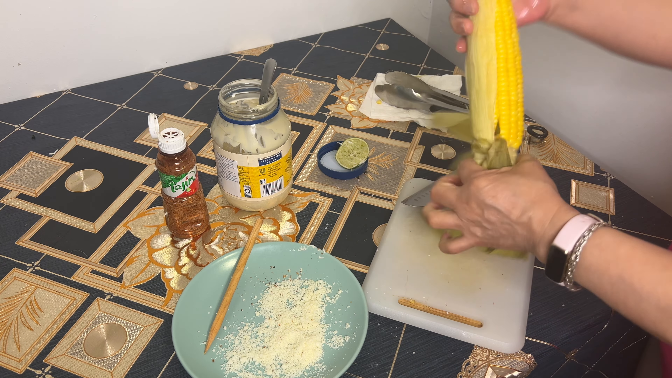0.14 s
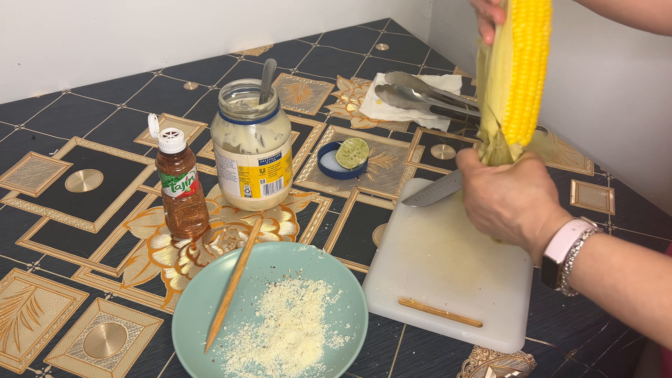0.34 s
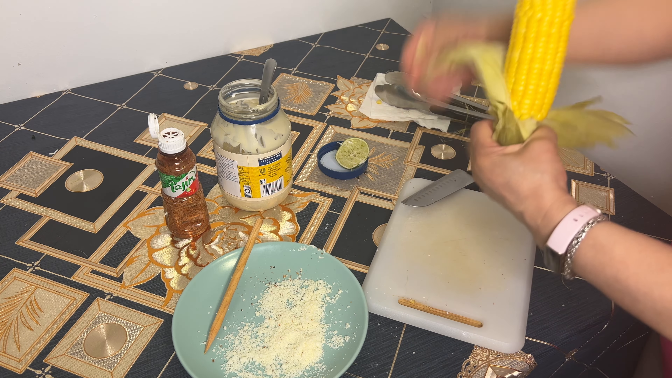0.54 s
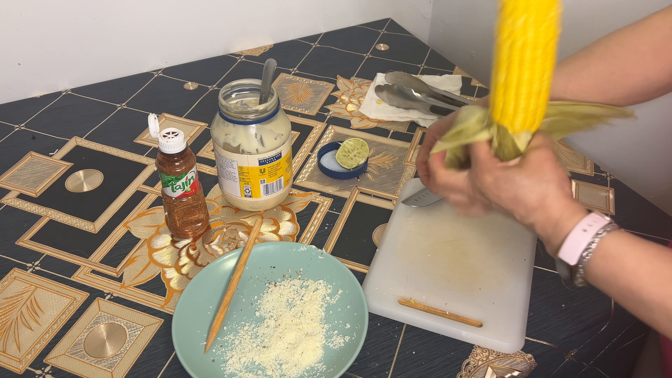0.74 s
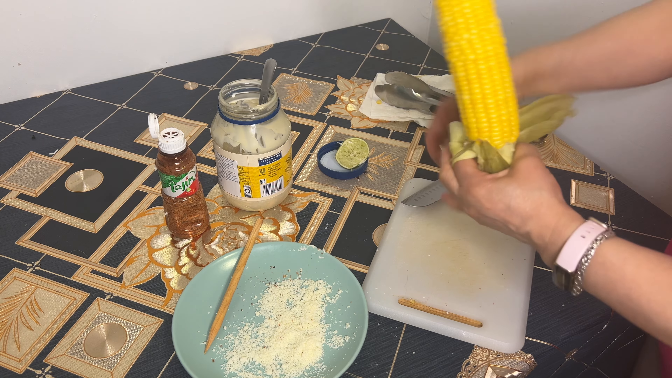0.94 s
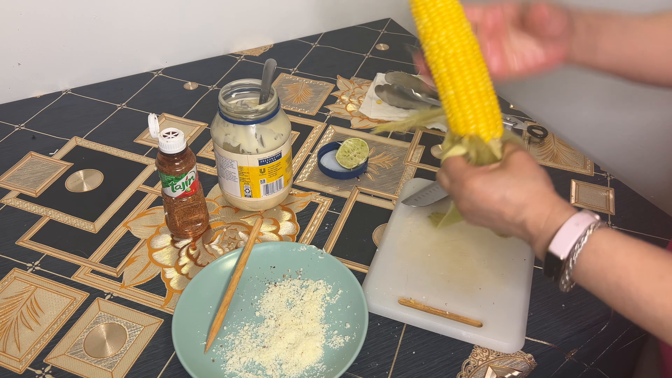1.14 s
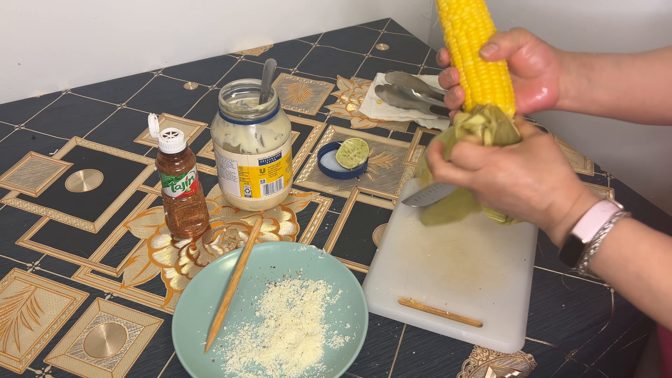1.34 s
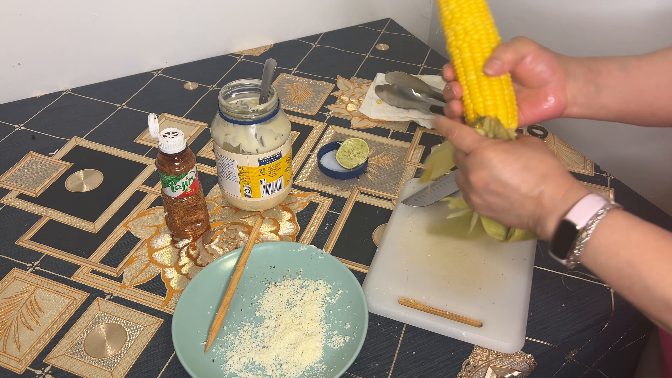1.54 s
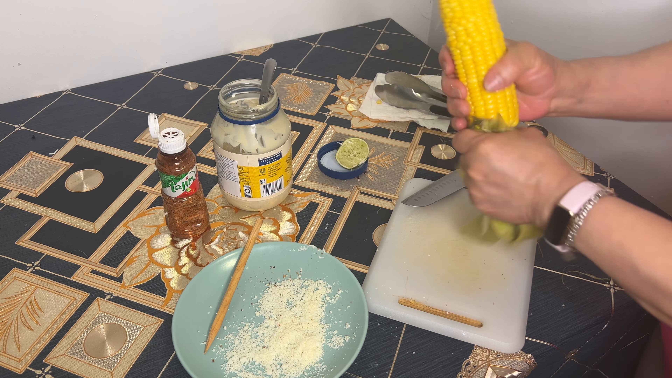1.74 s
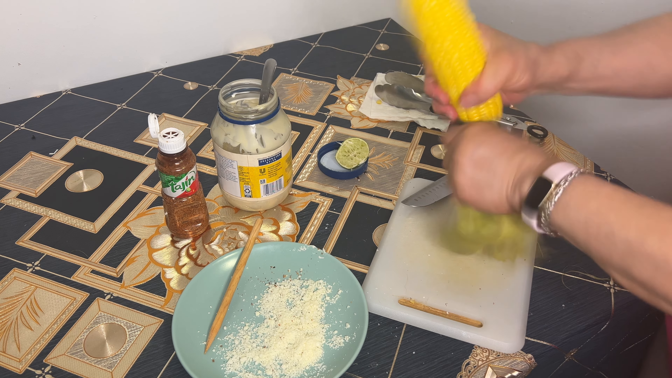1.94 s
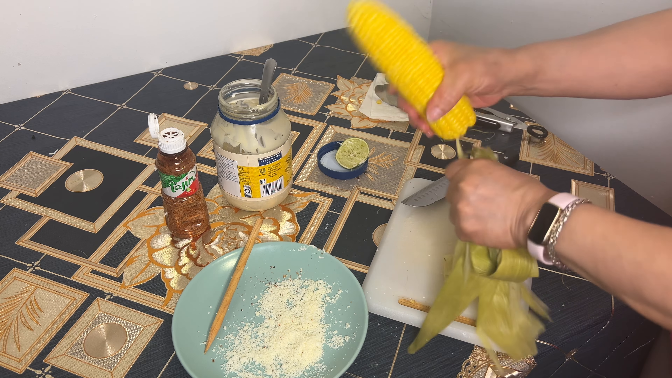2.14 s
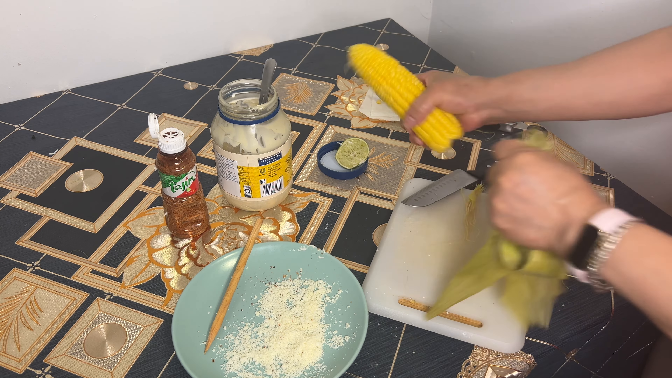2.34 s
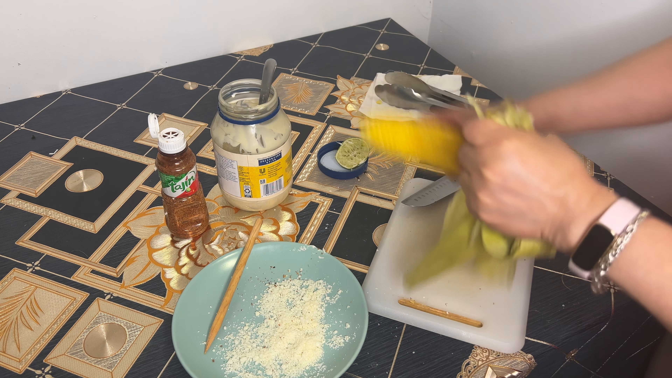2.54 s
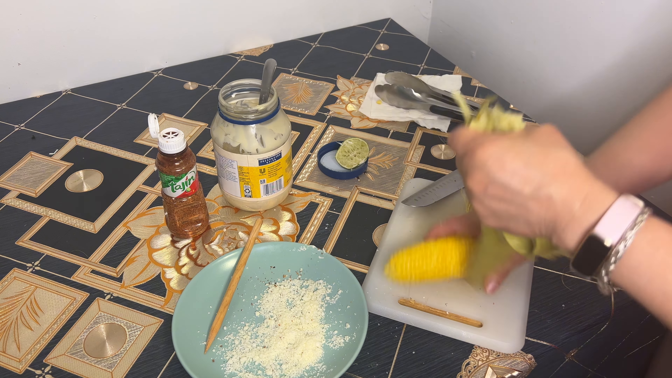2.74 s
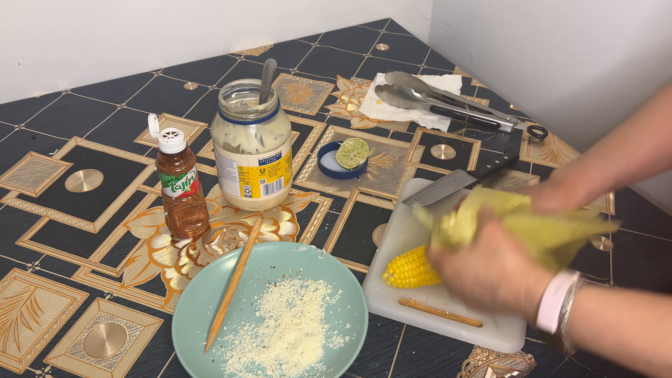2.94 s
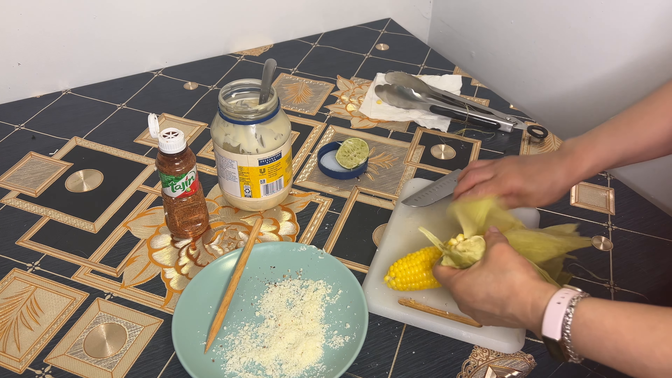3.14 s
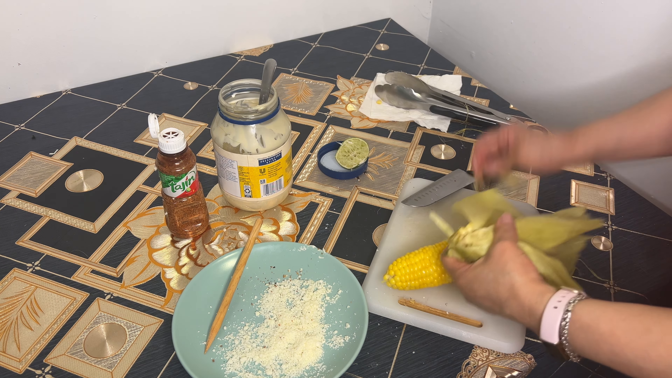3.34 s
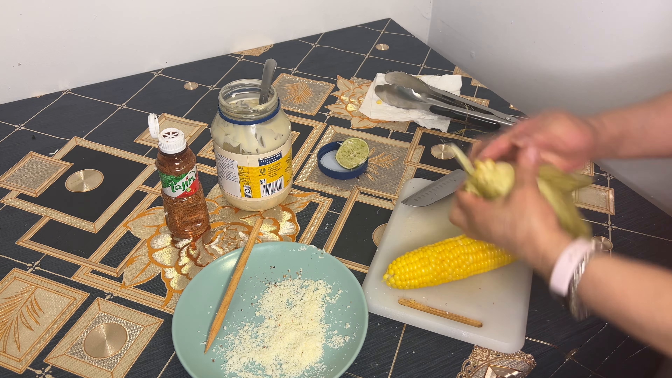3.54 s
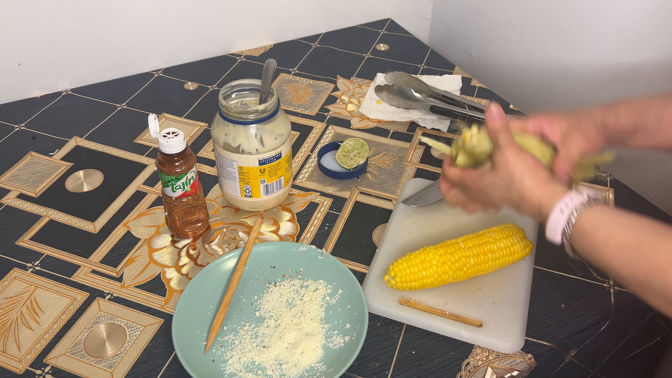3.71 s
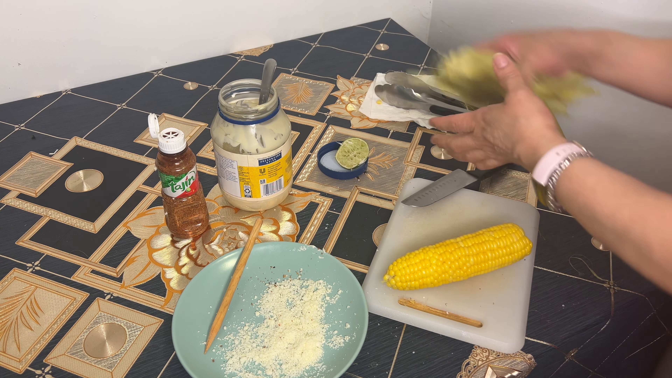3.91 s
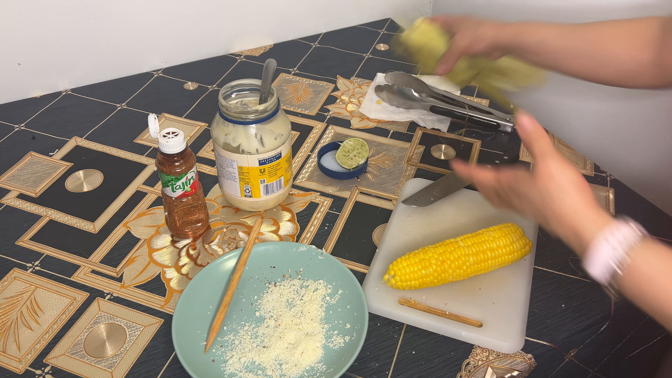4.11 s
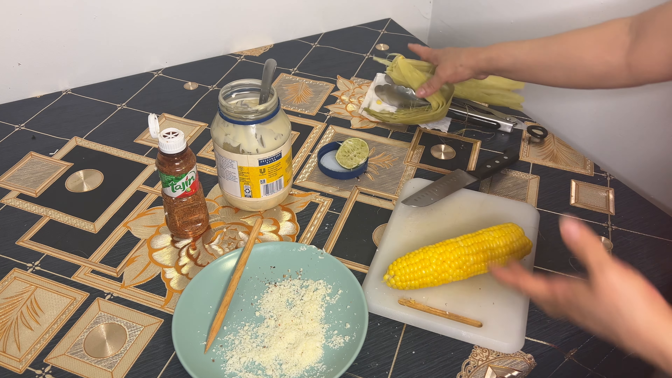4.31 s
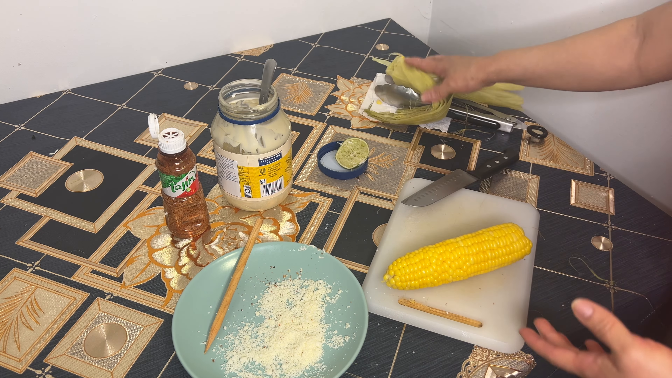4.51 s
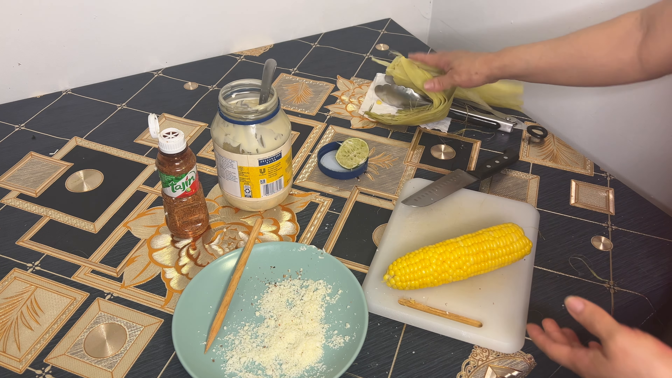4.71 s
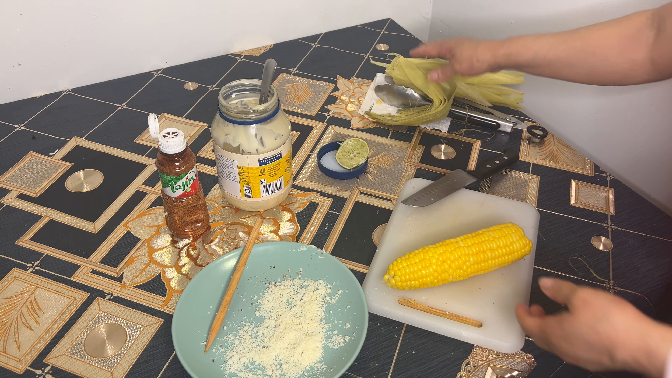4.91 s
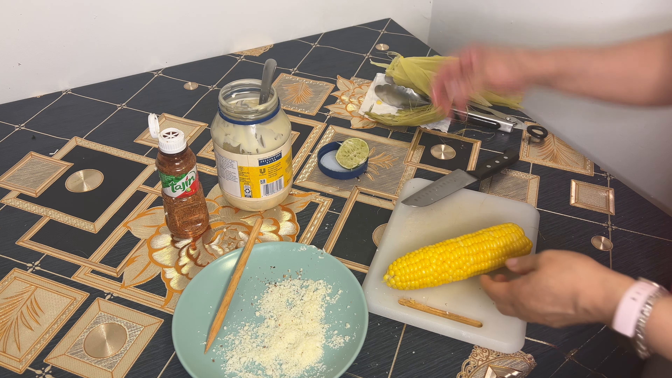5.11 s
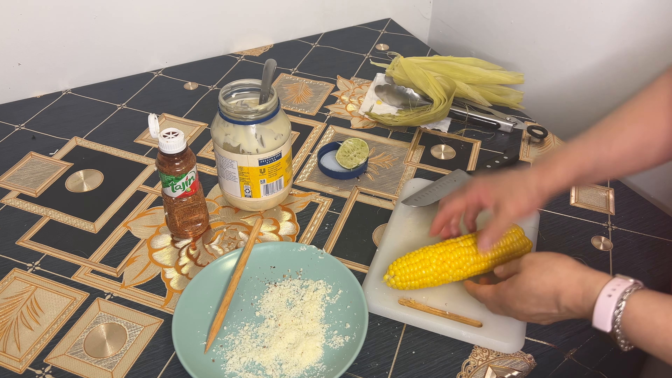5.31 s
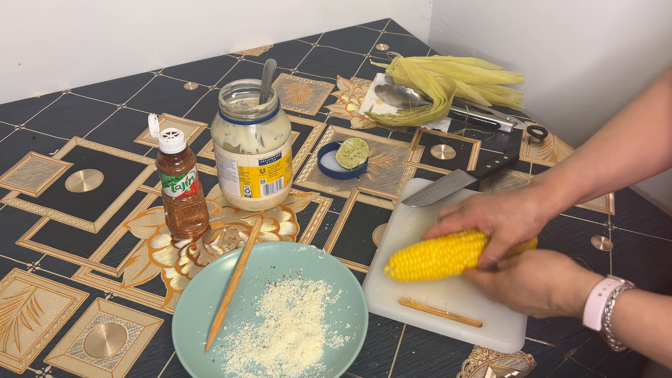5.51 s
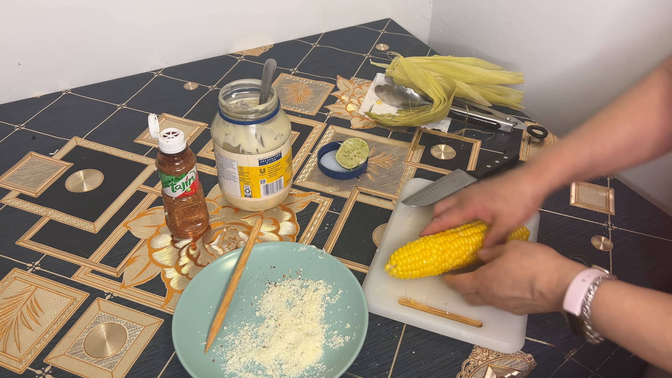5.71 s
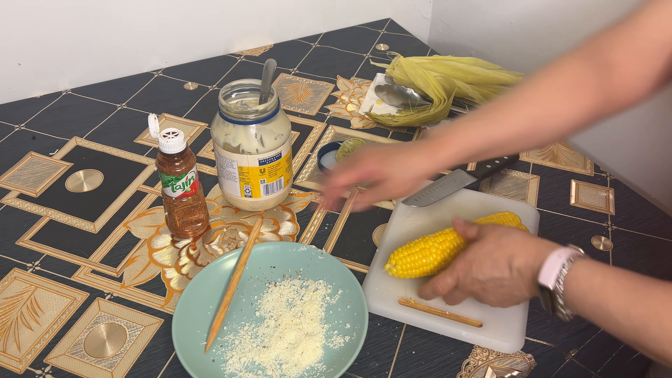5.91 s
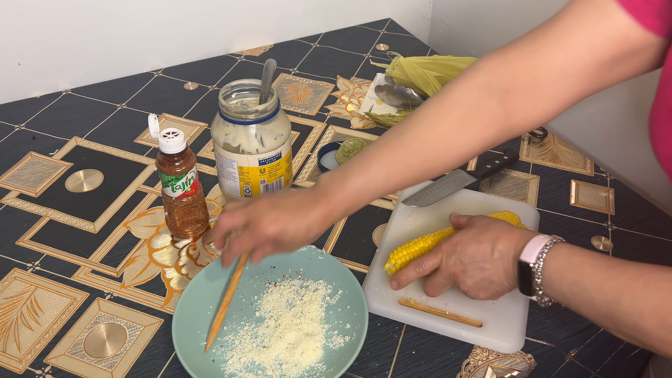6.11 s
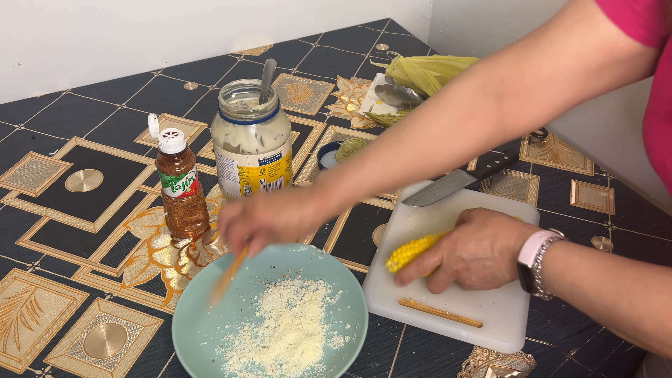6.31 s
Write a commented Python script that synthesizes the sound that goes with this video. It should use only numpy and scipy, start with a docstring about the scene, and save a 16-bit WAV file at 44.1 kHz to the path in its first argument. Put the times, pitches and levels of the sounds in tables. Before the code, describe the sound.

Dry corn husks rustle and snap as they are torn off an ear, then the cob thuds on a plastic cutting board in a quiet kitchen.

```python
"""Dry leaves rustle and crackle first: hands peel the husks off an ear of corn over a kitchen table.
Fibres snap as noise bursts, the stem rings as it breaks, and the cob knocks a plastic board and the table,
whose modes ring. Near the end a wooden stick clinks on a bowl. Soft low thumps and a puff of air on the
microphone are a few low cycles each, and filtered noise makes the rumble, hum and air stream of an
appliance behind a small room."""
import sys
import numpy as np
from scipy import signal
from scipy.fft import rfft, irfft, next_fast_len
from scipy.io import wavfile
from scipy.ndimage import uniform_filter1d, map_coordinates

SR = 44100
rng = np.random.default_rng(int(sys.argv[2]) if len(sys.argv) > 2 else 0)


def inscribe(sig):
    """Save sig as 16-bit PCM at rate SR to the path in sys.argv[1].

    A 1-D sig is mono; a 2-D sig holds one channel per row.
    Samples are clipped to [-1, 1] before scaling.
    """
    pcm = np.round(np.clip(np.atleast_2d(sig).T, -1, 1) * 32767)
    wavfile.write(sys.argv[1], SR, pcm.astype(np.int16))


N = 284606

# colour of the rustle as heard, for both hiss and creases: pitch_hz, relative gain_db
RUSTLE_COLOUR = [(150, -19), (400, -1), (900, -8.5), (2000, -3.5), (3000, -4), (4200, -6), (5200, -4),
                 (7000, -10.5), (8600, 1), (10200, -14.5), (11500, -2.5), (12800, -14), (14000, -13),
                 (16000, -8.5)]


def rustle():
    """Leaves slide over each other: a patchy hiss with creases crackling on it; strokes swell, sag and let go."""
    # strokes of the hands: peak_s, level_db, swell_s, length_s, sag_db_per_s,
    # top_db (top octave), body_db (stiff leaf bases), both relative to the stroke
    strokes = [(0.0, -62, .01, 0.067, 141, -4, 1.5), (0.091, -60.5, 0.037, 0.024, 20, -8.5, 4),
               (0.143, -65.5, 0.032, .12, 97, -12, -1), (0.309, -65.5, 0.067, 0.11, 103, -13, 2),
               (0.413, -67.5, .015, 0.12, 20, -8, -1), (0.625, -59, 0.11, 0.1, 194, -7.5, 1.5),
               (0.729, -62.5, 0.008, 0.13, 54, -0.5, 5), (0.993, -67, 0.31, 0.11, 64, -15, -1),
               (1.209, -65.5, 0.0086, 0.17, 54, -15, 1.5), (1.409, -72.5, .015, .3, -14.5, -11, 7),
               (1.787, -60.5, 0.077, 0.15, 92, -10.5, 2.5), (1.935, -43, 0.0056, 0.036, 250.5, 7.5, 1.5),
               (1.961, -50.5, .02, 0.13, 46, -0.5, 2), (2.143, -64, 0.033, 0.085, 30, -6, -3.5),
               (2.258, -67.5, .01, 0.023, 5, -1.5, 6), (2.27, -61, .02, 0.57, 65, -6, 5),
               (2.609, -58, 0.0062, .12, 141, -5, -4), (2.755, -67.5, 0.063, 0.08, -1, -10.5, 10.5),
               (2.845, -55, 0.012, .03, 200, -6.5, 0.5), (2.896, -64.5, 0.035, 0.21, 2, -13, 1),
               (3.181, -52.5, .005, 0.25, 142, -17, 9), (3.502, -59.5, .004, 0.078, 115, -10, 4.5),
               (3.626, -69, 0.058, .2, 5, -16, 4.5), (4.142, -62, .01, 0.036, 5, -4, 6),
               (4.185, -56, 0.074, 0.23, 174, -10.5, 0.5), (4.51, -75.5, 0.071, .05, 94, -14, 7),
               (4.653, -64.5, 0.032, 0.092, 130, -12, 6.5), (4.86, -73, 0.037, .02, 303, -7.5, 11),
               (5.01, -85, 0.085, 1.3, 0.5, -12, 7.5), (5.595, -79.5, .04, .03, 202, -24, -4),
               (6.19, -72.5, 0.24, 0.16, 41, -17.5, 5)]
    swell_depth_db, release_db_per_s = 19.5, 297
    dulling = 0.44  # extra fall of the top octave, as a share of the stroke's fall in dB
    t = np.arange(0, N / SR + 1, 1 / 1000)
    power = np.zeros((3, len(t)))  # middle, top, body
    for s, level_db, swell_s, length_s, sag_db_per_s, top_db, body_db in strokes:
        sag_db = sag_db_per_s * np.clip(t - s, 0, length_s)
        release_db = release_db_per_s * np.clip(t - s - length_s, 0, None)
        fall_db = sag_db + release_db
        stroke_db = level_db - swell_depth_db * np.clip(s - t, 0, None) / swell_s - fall_db
        band_db = [stroke_db, stroke_db + top_db - dulling * fall_db, stroke_db + body_db]
        power += amp(band_db) ** 2
    hiss = noise(RUSTLE_COLOUR, patchy_db=2) * amp(1.6 * wobble(40))
    leaf = hiss + amp(-6.5) * crackle(1500, cycles=2.1, spread_db=2.0)
    top = filtered(leaf, lambda hz: above(hz, 5700))
    body = filtered(leaf, lambda hz: 1 - above(hz, 1900))
    middle = leaf - top - body
    gains = np.array(curves(np.transpose([t, *np.sqrt(power)])))
    return np.sum(gains * [middle, top, body], axis=0)


def crackle(rate, cycles, spread_db):
    """Tiny creases flip over, rate a second: damped sines a few cycles long, each at its own pitch."""
    when, pitch, chance = np.split(rng.random((int(rate * N / SR), 3)), 3, axis=1)
    hz = 500 * 30 ** pitch  # 500 Hz to 15 kHz
    t = np.arange(200) / SR
    # the log of the chance makes a few creases much louder than the rest
    size = amp(along(RUSTLE_COLOUR, hz) - spread_db * np.log(chance + 0.0089)) * hz / 3000
    grains = size * np.exp(-t * hz / cycles) * np.sin(2 * np.pi * hz * t)
    where = (when * N).astype(int) + np.arange(200)
    return unit(np.bincount(where.ravel(), grains.ravel())[:N])


def snaps():
    """Each breaking fibre is a coloured burst of noise that dies fast."""
    # fibres breaking: start_s, level_db, brightness_db, body_db
    fibres = [(0.3096, -51, -21, -14), (0.4162, -48, -7, -17), (0.4915, -37.5, -8, -29),
              (0.5691, -31.5, -27, -17), (0.619, -34, -11, -34), (0.726, -41.5, 8.5, 0),
              (0.94, -50.5, 1.5, -23), (1.2082, -35.5, -32, -24), (1.4222, -41.5, -10, -39),
              (1.497, -44, -12, -13), (1.5914, -43.5, -4.5, -34), (1.762, -37, -12, -11),
              (1.7884, -42.5, -6, 5), (1.804, -46, -8, -5), (1.815, -46.5, -5, -9.5),
              (1.924, -42.5, -4.5, -20), (1.932, -21, -4.5, -14), (1.9364, -20, -4, -9),
              (1.941, -27, -5.5, -12), (1.9778, -28.5, -20, -2), (2.0326, -31, -29.5, -12),
              (2.075, -34.5, -17.5, -12), (2.11, -48, -15, -14), (2.2715, -31.5, -3, 11),
              (2.8416, -38, -12, 7), (2.9243, -32.5, -22, 0), (3.182, -27, -24, -27),
              (3.207, -32, -7.5, -1), (3.4976, -41, -14, -1), (4.17, -30.5, -6, 0), (4.18, -31, -4.5, -25),
              (4.6413, -39.5, -25.5, -3)]
    # colour of the snaps as heard: pitch_hz, relative gain_db
    snap_colour = [(200, -53), (600, -3.5), (2200, 1), (3000, -3), (4200, -9.5), (6800, -7), (8600, -3),
                   (10200, -19.5), (11800, -2), (14000, -14), (16000, -5)]
    out = np.zeros(N)
    for s, level_db, bright_db, body_db in fibres:
        burst = noise_burst(t60_s=0.021, rise_s=0.0029)

        def colour(hz):
            tilt_db = bright_db * above(hz, 4800) + body_db * (1 - above(hz, 1580))
            return amp(along(snap_colour, hz) + tilt_db)

        add(out, s, amp(level_db) * filtered(burst, colour))
    return out


def stem_break():
    """The stem rings briefly on its own modes when it breaks."""
    # the break: start_s, level_db
    start_s, level_db = (2.2715, -34)
    # modes of the stem: pitch_hz, level_db, t60_s
    stem_modes = [(343, 4.5, 0.023), (523, 2.5, 0.024), (960, -2, 0.057), (1500, -1.5, 0.017),
                  (2030, 7.5, 0.015), (2280, -24, 0.013)]
    out = np.zeros(N)
    add(out, start_s, amp(level_db) * ring(stem_modes, 1.18, 0.0062, damped_s=0.01, drift=0.49))
    return out


def board_knocks():
    """Every blow of the cob rings board and table until a hand damps them, with a slap of its skin on plastic."""
    # blows on the board: start_s, level_db, build_up_cycles, free_ring_s,
    # then levels relative to the blow: table_db, middle_modes_db, upper_modes_db, slap_db
    blows = [(1.986, -57.5, 0.43, 0.068, -4, 9.5, -23, -12), (2.734, -57, 0.38, 0.039, 15.5, 2, -6, -18),
             (2.766, -28, 0.89, 0.12, 4.5, 6.5, 0.5, -7), (2.877, -50, 0.62, 0.013, -14, -10, -18, -10),
             (2.922, -64.5, 1.2, 0.027, 7, -25, -15, 11), (3.186, -51.5, 0.32, 0.012, 1, 7.5, -12, 0.5),
             (3.195, -26.5, 1.16, 0.03, -10, -12.5, -2, -40), (3.24, -52.5, 1.2, 0.04, -19, 4.5, 3.5, -15),
             (3.551, -72.5, 0.9, .1, -8, -14, 16, 5), (3.666, -48, 1.4, 0.046, 2, -19, -32, -32),
             (4.17, -44.5, 0.92, 0.014, 3, -3, -14, -10), (4.187, -47, 0.76, 0.013, -15, -6.5, -7, -9),
             (4.217, -54.5, 1.1, .04, -10, -2.5, -10, -10.5), (4.661, -58, 1.2, 0.064, 7, -3.5, -10, -5),
             (4.987, -52.5, 1, .08, 8.5, -24, -19, -26), (5.581, -33.5, 0.71, 0.17, -5, -1, -6.5, -13.5),
             (6.166, -57.5, 0.97, 0.047, -6.5, 2, 6, 12.5), (6.189, -62, 0.77, .03, -14, 1, 1, 0)]
    # modes of the board on its table, in groups board's first mode, table top, middle, upper: pitch_hz,
    # level_db, t60_s
    board_modes = [
        [(137.7, 10, 0.14)],
        [(97.5, 2, 0.32)],
        [(226.3, -8, 0.2), (257.4, 0, 0.14), (299.4, -4, 0.12), (325, -8, 0.21), (355.5, -4.5, 0.21),
         (414.6, -8.5, 0.15), (328.5, 3.5, 0.066)],
        [(470, -0.5, 0.1), (526, -8.5, 0.033), (608, -12, 0.096), (698, -28, 0.18), (782, -17.5, 0.031),
         (925, -19.5, 0.12), (1146, -20, 0.028), (482, 0.5, 0.017)],
    ]
    # skin of the cob on plastic: pitch_hz, relative gain_db
    slap_colour = [(300, -15), (800, 13.5), (1300, 9), (1800, 1), (2500, -3), (3500, -18.5), (9000, -28),
                   (12000, -41)]
    out = np.zeros(N)
    for s, level_db, cycles, free_s, table_db, middle_db, upper_db, slap_db in blows:
        for modes, group_db in zip(board_modes, (0, table_db, middle_db, upper_db)):
            add(out, s, amp(level_db + group_db) * ring(modes, cycles, free_s))
        burst = noise_burst(t60_s=0.099, rise_s=0.0041)
        slap = filtered(burst, lambda hz: amp(along(slap_colour, hz)))
        add(out, s, amp(level_db + slap_db) * slap)
    return out


def bowl_clinks():
    """The bowl rings on three groups of modes after every touch of the stick, and is soon damped."""
    # stick on bowl: start_s, level_db, free_ring_s, middle_modes_db and top_modes_db relative to the clink
    clinks = [(6.166, -45.5, 0.016, -14, -30), (6.182, -58, 0.018, -7, -10), (6.194, -58.5, 0.0098, 4, -4),
              (6.204, -60.5, 0.014, 1, -9)]
    # modes of the bowl, in groups low, middle, top: pitch_hz, level_db, t60_s
    bowl_modes = [
        [(1071, 2.5, 0.17)],
        [(2160, -2.5, 0.08), (3352, -2, 0.11), (3950, -6, 0.077), (4740, -12, 0.096)],
        [(6170, -6, .08), (8100, -2, 0.09), (9340, -6.5, 0.065)],
    ]
    out = np.zeros(N)
    for s, level_db, free_s, middle_db, top_db in clinks:
        for modes, group_db in zip(bowl_modes, (0, middle_db, top_db)):
            add(out, s, amp(level_db + group_db) * ring(modes, 0.3, free_s, damped_s=0.014, drift=0.064))
    return out


def thumps():
    """Soft low thumps and a puff of air on the microphone: a few low cycles that swell and fade."""
    # thumps and puff: centre_s, level_db, pitch_hz, length_s
    low_thumps = [(0.357, -49.5, 72.5, 0.034), (1.021, -44.5, 74, 0.017), (1.677, -44.5, 82, 0.019),
                  (2.357, -33, 80, 0.015), (3.689, -36, 74.3, 0.053), (3.944, -47.5, 62.5, 0.053),
                  (4.193, -33.5, 135, 0.016), (4.414, -44.5, 75, 0.031), (4.478, -45.5, 71.4, .04),
                  (4.698, -48, 69, 0.061), (5.024, -46.5, 69, 0.066)]
    t = np.arange(N) / SR
    out = np.zeros(N)
    for s, level_db, hz, length_s in low_thumps:
        swell = np.exp(-(2 * (t - s) / length_s) ** 2)
        out -= amp(level_db) * swell * np.cos(2 * np.pi * hz * (t - s))
    return out


def house():
    """Lumpy rumble in two parts, a wavering hum and the air stream of an appliance, all coloured noise."""
    # noise of the house over time: time_s, rumble_db, deepest_rumble_db, mains_hum_db, air_db, whistle_db
    levels = [(0.0, -56, -71, -60.5, -69.5, -82), (0.3, -63.5, -74, -75, -69, -79),
              (0.55, -59, -66, -68, -68, -78.5), (0.84, -67.5, -76, -63.5, -74.5, -76),
              (1.18, -62.5, -68, -62.5, -68.5, -80.5), (1.49, -67.5, -69, -60, -69.5, -80),
              (2.33, -67.5, -65, -67, -69.5, -83), (2.57, -63.5, -64, -72, -65, -68),
              (2.87, -72.5, -54.5, -64, -73, -79.5), (3.27, -69, -59, -65, -71, -77.5),
              (3.63, -71, -65.5, -63, -66, -75), (3.81, -56, -56, -64, -64.5, -73.5),
              (4.15, -61, -73, -72, -69.5, -77.5), (4.49, -59.5, -66, -63.5, -67, -76),
              (5.39, -79, -61, -67.5, -67, -76.5), (5.84, -66, -59, -68.5, -68.5, -78.5),
              (6.12, -80.5, -60, -62, -67, -80), (6.45, -57.5, -64, -65, -69, -82)]
    # colour of the rumble: pitch_hz, relative gain_db
    rumble_colour = [(20, -38.5), (48, -3), (70, 3.5), (100, -14.5), (140, -7.5), (200, -60)]
    # lines of the hum: pitch_hz, width_hz, level_db
    hum_lines = [(116.1, 13, 1.5), (226, 52, -18.5), (334.6, 9.1, -12)]
    # air stream of the appliance: pitch_hz, relative gain_db
    blower_colour = [(130, -9), (200, 9.5), (350, -6), (800, -16.5), (980, -3.5), (1200, -13), (1650, 1.5),
                     (2500, -6.5), (2900, -22), (4600, -35), (8200, -37), (12800, -39), (13400, -55)]
    # thin upper band of the air stream: pitch_hz, relative gain_db
    whistle_colour = [(4800, -34), (5800, -6), (6500, -9.5), (7000, -5.5), (7350, -2), (7800, -9.5),
                      (8200, -28.5), (9000, -49)]
    rumble_db, deep_db, hum_db, air_db, whistle_db = curves(levels)

    rumble = amp(3.3 * wobble(16)) * noise(rumble_colour, patchy_db=1.0)
    upper = filtered(rumble, lambda hz: above(hz, 48.2) ** 2)
    deep = rumble - upper

    def lines(hz):
        return sum(amp(db) / (1 + (2 * (hz - centre) / width) ** 2) for centre, width, db in hum_lines)

    hum = unit(filtered(rng.standard_normal(N), lines))
    air = amp(air_db) * noise(blower_colour, patchy_db=2.0)
    whistle = amp(whistle_db) * noise(whistle_colour, patchy_db=3.5)
    return amp(rumble_db) * unit(upper) + amp(deep_db) * unit(deep) + amp(hum_db) * hum + air + whistle


def kitchen(x):
    """The small room answers with a noise tail in which each frequency dies at its own speed."""
    # decay of the room: pitch_hz, t60_s
    room_decay = [(100, 0.28), (400, 0.27), (2000, 0.17), (10000, 0.079)]
    hz, t, z = signal.stft(rng.standard_normal(SR // 2), SR, nperseg=256)
    decay = amp(-60 * t / along(room_decay, hz)[:, None])
    tail = signal.istft(z * decay, SR, nperseg=256)[1]
    delayed = np.pad(x, (250, 0))  # in samples
    return signal.fftconvolve(delayed, tail / np.linalg.norm(tail))[:N]


def ring(modes, cycles, free_s, damped_s=.05, drift=.1):
    """Modes build up over some of their own cycles, so high ones arrive first; a touch stops them later."""
    t = np.arange(SR // 3) / SR
    touch = amp(-60 * np.clip(t - free_s, 0, 1) / damped_s)
    # loose contact with the support lets each phase wander
    walk = drift * np.cumsum(rng.standard_normal((len(modes), len(t))), axis=1) / np.sqrt(SR)
    out = np.zeros(len(t))
    for k, (hz, level_db, t60_s) in enumerate(modes):
        decay = amp(level_db - 60 * t / t60_s)
        build_up = 1 - np.exp(-(t * hz / cycles) ** 2)
        wander = np.sqrt(hz) * uniform_filter1d(walk[k], size=200)
        out += (-1) ** k * decay * build_up * np.sin(2 * np.pi * hz * t + wander)
    return touch * out


def noise_burst(t60_s, rise_s):
    """White noise with a short linear rise and an exponential decay."""
    t = np.arange(SR // 4) / SR
    return rng.standard_normal(len(t)) * amp(-60 * t / t60_s) * np.clip(t / rise_s, 0, 1)


def noise(spectrum, patchy_db):
    """Coloured noise of rms 1 with patches of random gain over time and frequency."""
    z = signal.stft(rng.standard_normal(N), nperseg=256)[2]
    field = uniform_filter1d(uniform_filter1d(rng.standard_normal(z.shape), 4, 0), 8, 1)
    raw = signal.istft(z * amp(patchy_db * unit(field)), nperseg=256)[1][:N]
    return unit(filtered(raw, lambda hz: amp(along(spectrum, hz))))


def amp(db):
    """Gain of a level in dB."""
    return 10 ** (np.asarray(db) / 20)


def unit(x):
    """Scaled to rms 1."""
    return x / np.sqrt(np.mean(x ** 2) + 1e-20)


def along(points, hz):
    """Reads a curve of (Hz, value) points on a log frequency axis."""
    f, v = np.transpose(points)
    return np.interp(np.log(hz + 1), np.log(f + 1), v)


def curves(rows):
    """One value per sample for each column after the time."""
    s, *cols = np.transpose(rows)
    return [np.interp(np.arange(N) / SR, s, c) for c in cols]


def wobble(rate):
    """A smooth random curve, rate knots a second."""
    return map_coordinates(rng.standard_normal(int(N * rate / SR) + 4), [np.arange(N) * rate / SR])


def above(hz, corner_hz):
    """Gain that rises from 0 to 1 around the corner."""
    return 1 / (1 + (corner_hz / (hz + 1)) ** 4)


def filtered(x, response):
    """Shapes the spectrum of x by a response of frequency."""
    m = next_fast_len(len(x) + 4096)
    return irfft(rfft(x, m) * response(np.fft.rfftfreq(m, 1 / SR)), m)[:len(x)]


def add(track, s, sound):
    """Mixes a sound into the track from time s on."""
    part = track[round(s * SR):][:len(sound)]
    part += sound[:len(part)]


def scene():
    """Everything on the table, its room, and the house behind."""
    crisp = snaps()
    knocks = stem_break() + board_knocks() + bowl_clinks()
    wet = kitchen(amp(-16.0) * crisp + amp(-12) * knocks)
    return (rustle() + crisp + knocks + wet + thumps() + house())[None]


def record(dry):
    """The microphone drops the deepest bass; nothing is kept above the band limit."""
    top_hz = 15900
    return filtered(dry[0], lambda hz: above(hz, 24) * (hz < top_hz))[None]


dry = scene()
out = record(dry)
inscribe(out)
```